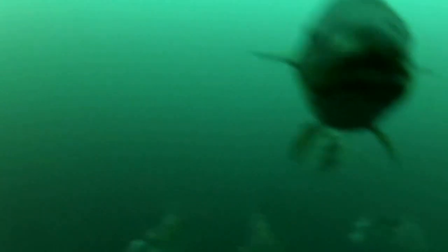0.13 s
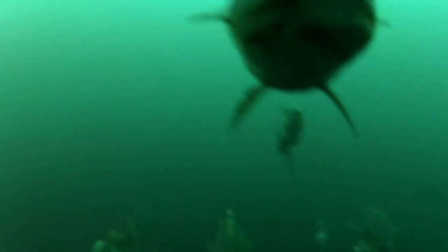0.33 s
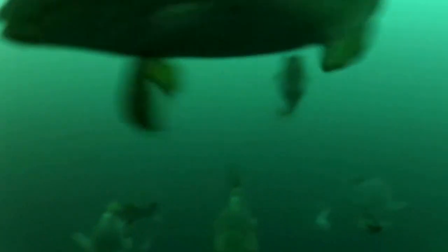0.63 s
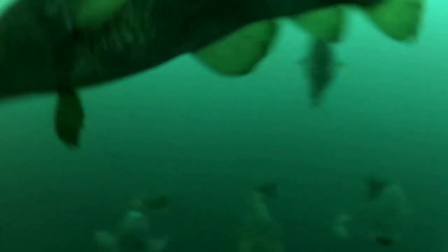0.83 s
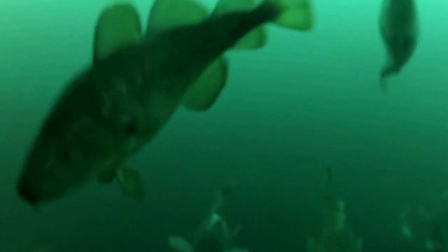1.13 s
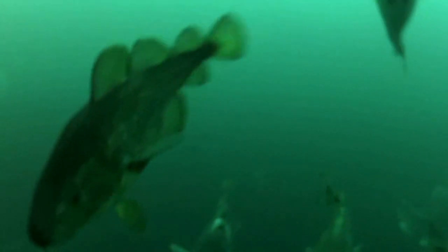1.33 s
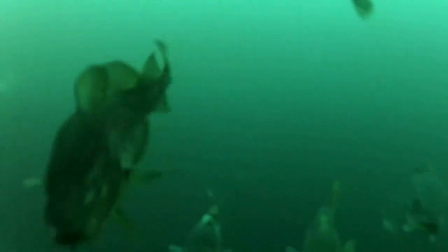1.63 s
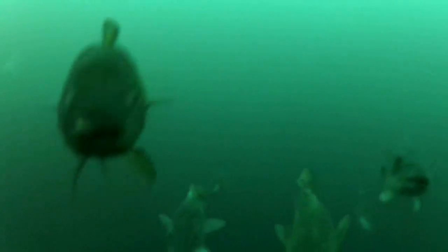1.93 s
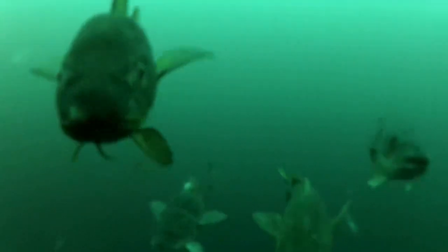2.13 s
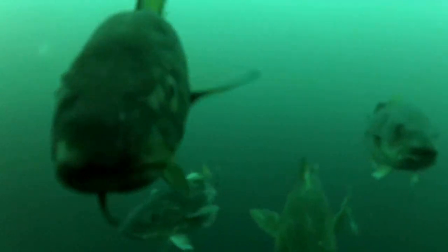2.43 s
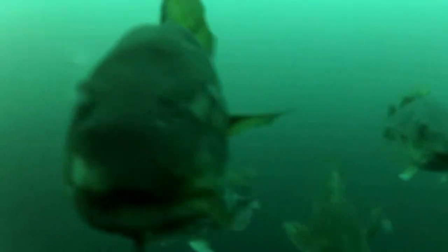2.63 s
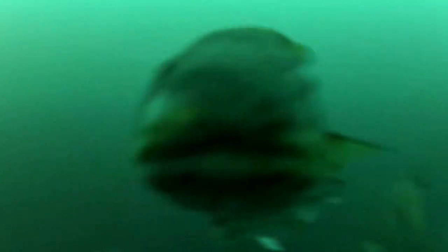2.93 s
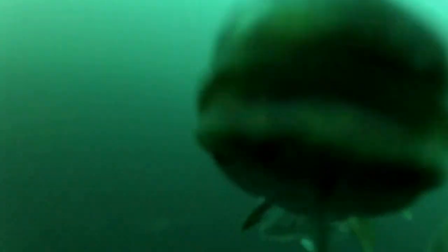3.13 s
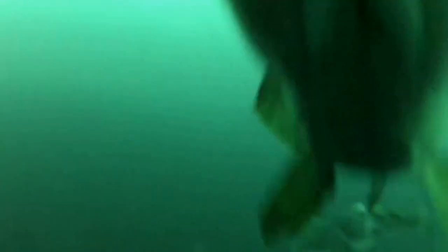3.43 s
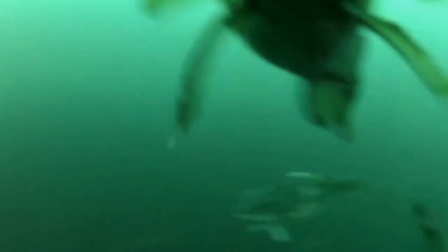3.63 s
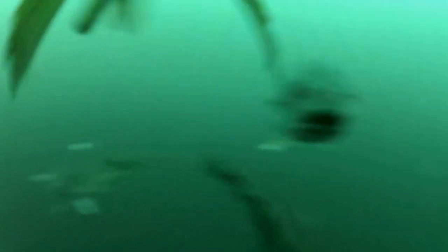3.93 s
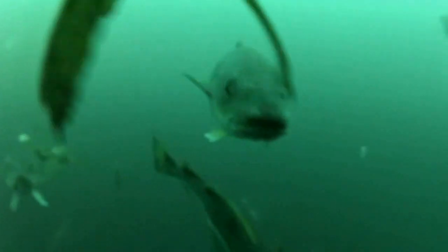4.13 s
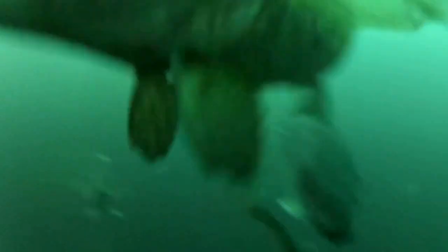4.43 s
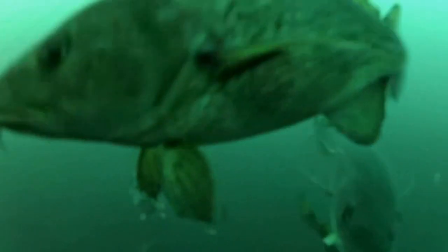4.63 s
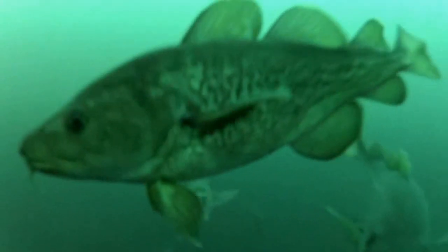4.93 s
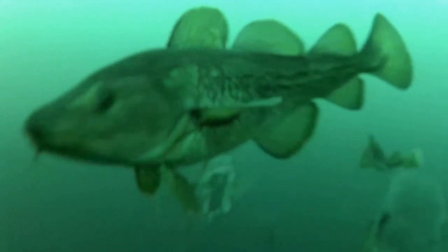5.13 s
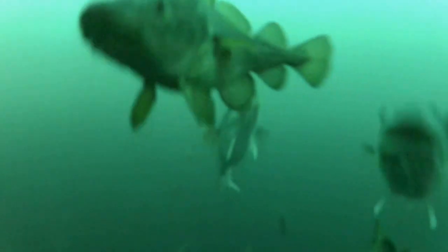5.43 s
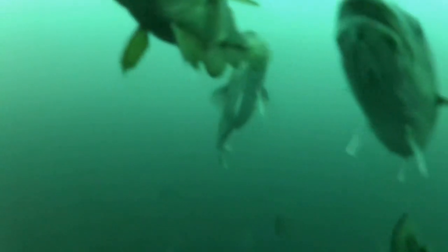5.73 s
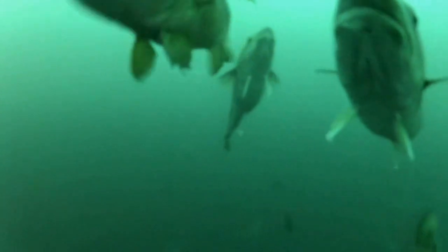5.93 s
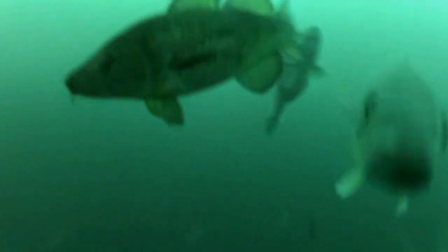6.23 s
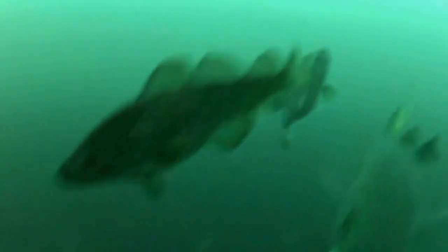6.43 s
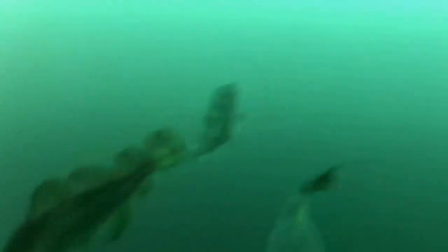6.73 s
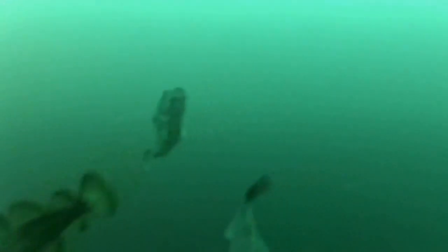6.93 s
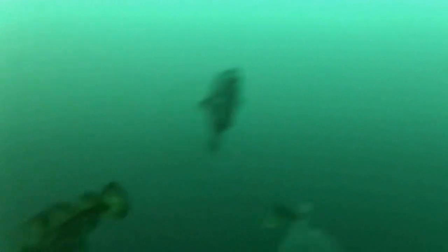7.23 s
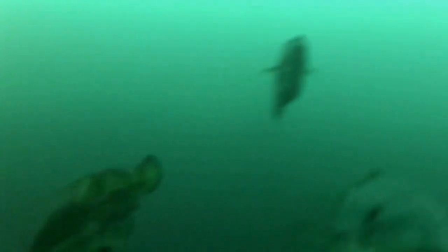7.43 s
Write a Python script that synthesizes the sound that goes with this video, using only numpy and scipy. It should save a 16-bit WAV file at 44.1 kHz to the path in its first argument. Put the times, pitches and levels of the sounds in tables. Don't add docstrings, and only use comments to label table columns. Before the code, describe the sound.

Inside a sealed camera hanging underwater, a faint low rumble, wavering hum and hollow hiss continue throughout. A dull thud comes after half a second, then tiny rubs. Past three seconds a strong bump with scraping lands, followed by the hardest knock at four seconds with crisp rattles and nibbling ticks. Afterwards only light taps and faint scratches remain. The sound is close, muffled and low-fidelity.

```python
import sys
import numpy as np
from scipy import signal
from scipy.fft import rfft, irfft
from scipy.io import wavfile
from scipy.ndimage import uniform_filter1d

SR = 44100
rng = np.random.default_rng(int(sys.argv[2]) if len(sys.argv) > 2 else 0)


def volts_from_db(level):
    exponent = np.asarray(level, float) / 20
    return 10 ** exponent


def wrap_up_sound(samples):
    columns = np.atleast_2d(samples).T
    tamed = np.clip(columns, -1, 1)
    steps = np.round(tamed * 32767).astype(np.int16)
    wavfile.write(sys.argv[1], SR, steps)


N = 334278

# (time [s], strum rate [Hz], strength [dB], harmonic it favours [number])
LINE_STRUM = [(0, 26.24, -67.5, 3), (.35, 27.6, -64.5, 3.4), (1.0, 26.1, -59.5, 3.26),
              (1.35, 25, -64.5, 2.7), (1.7, 25.4, -62.5, 2.8), (2.05, 28.94, -60, 3.8),
              (2.7, 29.07, -60.5, 3.1), (2.95, 29.33, -66, 2.3), (3.8, 29.48, -60, 2.6),
              (4.5, 29.49, -61.5, 3.36), (5.2, 26.14, -67.5, 2.4), (5.45, 28.24, -59.5, 3.1),
              (6.05, 29.77, -62.5, 2.38), (6.35, 29.25, -64.5, 3.4), (6.65, 25, -61, 2.7),
              (6.88, 23.56, -76, 3.1), (7.05, 21.64, -66, 3.5), (7.58, 21.84, -66.5, 2.3)]


def rms_one(x):
    return x / np.sqrt(np.mean(x ** 2) + 1e-20)


def in_time(rows):
    s, *columns = np.transpose(rows)
    return [np.interp(np.arange(N) / SR, s, column) for column in columns]


def drift(rate):
    r = np.exp(-80 * np.pi * rate / SR)
    noise = rng.standard_normal(N // 40 + 2002)
    slow = signal.lfilter([1], [1, -2 * r, r * r], noise)[2000:]
    return np.interp(np.arange(N) / 40, np.arange(len(slow)), rms_one(slow))


def resonate(x, hz, width_hz):
    r = np.exp(-np.pi * width_hz / SR)
    top = np.array([1, 0, -1]) * (1 - r * r) / 2
    return signal.lfilter(top, [1, -2 * r * np.cos(2 * np.pi * hz / SR), r * r], x)


def banded_noise(spectrum, patchy_db, flicker):
    hz, level_db = np.transpose(spectrum)
    edges = hz[0] * 2 ** np.arange(0, np.log2(hz[-1] / hz[0]) + .2, 1 / 3)
    together = drift(flicker / 2)
    white = rng.standard_normal((2, N))
    out = 0
    for k, (low, high) in enumerate(zip(edges, edges[1:])):
        band_pass = signal.butter(2, [low, high], "band", fs=SR, output="sos")
        band = signal.sosfilt(band_pass, white[k % 2])
        colour_db = np.interp(np.log(low * high) / 2, np.log(hz), level_db)
        flicker_db = patchy_db * (0.82 * together + drift(flicker))
        out = out + volts_from_db(colour_db + flicker_db) * band
    return rms_one(out)


def blows(firmness):
    # (time [s], direction [sign and share], peak [dB], swing [Hz], time to peak [s])
    firming = [
        (0.5296, 1, -21.1, 113, .0044),
        (0.5515, -1, -32.3, 84, .0047),
        (3.324, -1, -37.8, 27, .0105),
        (4.0143, -1, -15.8, 49, .0078),
        (4.0688, 1, -29.2, 121, .0035),
        (4.2527, 1, -37.2, 20, .0175),
        (4.2734, -1, -41.0, 31, .0093),
    ]
    sliding = [
        (0.556, 1, -34.1, 55, .0263),
        (3.287, -1, -33.0, 41, .0282),
        (4.0315, 1, -17.3, 37, .0067),
        (4.0398, -1, -18.4, 56, .0158),
    ]
    yielding = [
        (0.5368, 1, -27.9, 53, .0115),
        (3.3062, -1, -14.6, 93.5, .0091),
        (4.2663, 1, -33.8, 164, .003),
        (4.319, 1, -43, 82, .008),
        (4.407, -1, -41, 80, .006),
        (5.46, -1, -45, 220, .008),
    ]
    slaps = [
        (.5312, -0.87, -37, 370, 0.0035),
        (.54, -0.96, -41, 310, 0.0012),
        (1.8405, 1, -43.5, 450, 0.0036),
        (1.86, 0.88, -53, 209, 0.017),
        (3.352, 0.98, -51, 350, 0.016),
        (4.778, 0.91, -54.5, 1040, .013),
        (5.7, 0.54, -52, 176, 0.01),
    ]
    t = np.arange(SR // 8) / SR
    out = np.zeros(N)
    for table, sag_per_s in ((firming, -19), (sliding, 77), (yielding, 26), (slaps, 0)):
        for s, direction, peak_db, hz, rise in table:
            load = (t / rise * np.exp(1 - t / rise)) ** firmness
            swing = np.sin(2 * np.pi * hz * t / np.maximum(1 + sag_per_s * t, .3))
            at = round(s * SR)
            out[at:at + len(t)] += direction * volts_from_db(peak_db) * load * swing
    return out


def scrape_pressure():
    # (time of most pressure [s], wall level [dB], build-up [s], let-go [s])
    fin_rubs = [(1.19, -67, .01, 0.021), (1.85, -62, .0022, 0.012), (1.876, -67, 0.0048, 0.0047),
                (1.895, -59, 0.0031, 0.0067), (1.914, -71, 0.0018, 0.015), (3.343, -57, 0.0061, 0.0037),
                (3.350, -50, .0012, .002), (3.359, -65, 0.0031, .013), (4.79, -66, 0.019, .016),
                (4.826, -79, .003, .0031), (6.68, -66.5, 0.015, 0.011)]
    scale_rubs = [(2.122, -53.5, .006, 0.0036), (3.317, -50.5, 0.0073, 0.0055), (3.350, -51.5, .0012, .002),
                  (4.029, -42, 0.0016, 0.0043), (4.065, -46, 0.0077, 0.0019), (4.071, -35, 0.0007, 0.0031),
                  (5.25, -53.5, 0.0038, .0077), (5.385, -57, 0.0026, .0033), (6.79, -62, 0.0058, .011)]
    tooth_nips = [(4.038, -53, 0.0021, .0025), (4.082, -51, 0.0046, 0.015), (4.268, -37.5, 0.002, 0.0026),
                  (4.2737, -45, .0011, .004), (4.281, -58, 0.0021, 0.0018), (5.234, -58.5, 0.0046, .005),
                  (6.95, -64, .045, 0.043)]
    lip_nips = [
        (4.367, -57, 0.0024, .0025),
        (4.388, -54, 0.0022, 0.0019),
        (4.397, -63, 0.0018, 0.0049),
    ]
    # (dull ringing [dB], bright ringing [dB])
    fin = (10.1, -22)
    scale = (-4, -11)
    tooth = (-9.5, -2.9)
    lip = (6.9, -2)
    reach = SR // 10
    t = np.arange(-reach, reach) / SR
    pressure = np.zeros((3, N))
    for table, colour in ((fin_rubs, fin), (scale_rubs, scale), (tooth_nips, tooth), (lip_nips, lip)):
        dull_db, bright_db = colour
        for s, wall_db, build, release in table:
            at = round((s - .001) * SR)
            stroke = np.exp(np.minimum(t / build, -t / release))
            share_db = np.array([[dull_db], [0], [bright_db]])
            pressure[:, at - reach:at + reach] += volts_from_db(wall_db + share_db) * stroke
    return pressure


def scrapes(per_s, spread_db):
    # (pitch [Hz], level [dB], time to fade by 60 dB [s])
    dull_modes = [(250, -6, .03), (360, 1, .06), (540, 3, .045), (730, -7, .03), (980, -7, .025),
                  (1210, -5, .025)]
    wall_modes = [(1215, -12, .02), (1540, -1, .018), (1930, 0, .016), (2360, 1, .014), (2700, -6, .008)]
    bright_modes = [(3125, -1, .019), (3390, 1, .019), (3700, -7, .012), (4550, -11, .006),
                    (5120, -15, .006)]
    happens = rng.random(N) < per_s / SR
    strength = volts_from_db(spread_db * np.minimum(rng.exponential(1, N), 3))
    clicks = rms_one(happens * strength * rng.choice([-1, 1], N))
    out = 0
    for modes, force in zip((dull_modes, wall_modes, bright_modes), scrape_pressure()):
        widths = [np.log(1000) / (np.pi * t60) for hz, level_db, t60 in modes]
        power = sum(volts_from_db(2 * mode[1]) * np.pi * width / SR for mode, width in zip(modes, widths))
        for k, ((hz, level_db, t60), width_hz) in enumerate(zip(modes, widths)):
            push = np.roll(clicks, 97 * k) * force + 1e-18
            gain = (-1) ** k * volts_from_db(level_db) / np.sqrt(power)
            out = out + gain * resonate(push, hz, width_hz)
    soft_top = signal.butter(2, 4500, fs=SR, output="sos")
    return volts_from_db(-0.5) * signal.sosfilt(soft_top, out)


def strum(wobble, unsteady_db):
    hz, strength_db, favoured = in_time(LINE_STRUM)
    phase = 2 * np.pi * np.cumsum(hz * (1 + wobble * drift(2.854))) / SR
    hum = 0
    for k in range(3):
        harmonic = k + 2
        off_favour_db = 3.2 * (harmonic - favoured) ** 2
        level_db = strength_db - off_favour_db + unsteady_db * drift(5.1)
        hum = hum + np.sqrt(2) * volts_from_db(level_db) * np.sin(harmonic * phase + k * 1.44)
    return hum, np.sin(phase)


def wall_hiss(patchy_db):
    # (pitch [Hz], width [Hz], level [dB])
    walls = [(925, 126, -11), (1134, 130, -6.5), (1236, 116, -3), (1620, 187, -5), (1935, 190, 1),
             (2170, 99, -8), (2431, 316, 0.5), (2510, 320, -24)]
    gusts = drift(4.4)
    white = rng.standard_normal((2, N))
    out = 0
    for k, (hz, width_hz, level_db) in enumerate(walls):
        once = resonate(white[k % 2], hz, 1.25 * width_hz)
        tone = rms_one(resonate(once, hz, 1.25 * width_hz))
        out = out + volts_from_db(level_db + patchy_db * (1.0 * gusts + 0.3 * drift(6.0))) * tone
    return rms_one(out)


def water_noise(flow_db):
    # (pitch [Hz], level [dB per Hz])
    rumble = [(8, -9), (20, -15), (32, -4.5), (50, -1.5), (80, -0.5), (120, -1.5), (160, -8.5), (230, -8.5)]
    wash = [(88, -25), (150, -2), (362, -4), (463, -7.5), (700, -12.5), (1000, -14), (1300, -45),
            (2200, -120)]
    shake_db = in_time(LINE_STRUM)[1]
    rumble_db = -63 + .25 * (shake_db - shake_db.mean())
    wash_db = -61.5 + 0.37 * flow_db
    water = volts_from_db(rumble_db) * banded_noise(rumble, patchy_db=1.0, flicker=10.0)
    return water + volts_from_db(wash_db) * banded_noise(wash, patchy_db=1.07, flicker=17.0)


def circuit_noise():
    # (pitch [Hz], level [dB per Hz])
    self_noise = [(700, -0.5), (1400, -3.5), (2800, -2), (3600, -3), (4300, -3.5), (5000, -5.5), (7000, -3)]
    return volts_from_db(-67) * banded_noise(self_noise, patchy_db=-0.14, flicker=32.0)


def scene():
    # (time [s], flow above its mean [dB])
    flow = [(0.0, 0), (0.7, -1.5), (1.5, -1), (1.94, 2), (2.8, -0.2), (3.3, 0.2), (4.2, -0.7), (5.3, 1),
            (6.0, 0.2), (6.5, 1.8), (7.03, 4), (7.3, 0.9), (7.58, 1.7)]
    flow_db, = in_time(flow)
    fish = blows(firmness=4) + scrapes(per_s=6000, spread_db=3.5)
    hum, eddy = strum(wobble=0.0298, unsteady_db=2.0)
    walls = volts_from_db(-62.5 + flow_db) * wall_hiss(patchy_db=0.88)
    gusty_walls = walls * volts_from_db(1.0 * eddy)
    return (fish + hum + gusty_walls + water_noise(flow_db) + circuit_noise())[None]


def drop_faint_bands(x):
    # (pitch [Hz], level [dB per Hz])
    audible = [(10500, -132), (11500, -127), (13000, -125), (13450, -121), (14000, -124), (15250, -125),
               (15400, -114), (15900, -90)]
    hz, t, bins = signal.stft(x, SR, nperseg=1024, scaling="psd")
    power = uniform_filter1d(abs(bins) ** 2, size=5, axis=-2)
    power = uniform_filter1d(power, size=3, axis=-1)
    line = volts_from_db(2 * np.interp(hz, *np.transpose(audible), left=-200))
    return signal.istft(bins * (power > line[:, None]), SR, nperseg=1024, scaling="psd")[1][..., :N]


def band_limit(x):
    return signal.sosfilt(signal.butter(12, 15670, fs=SR, output="sos"), x)


def record(dry):
    hold_hz = 12012
    x = signal.sosfilt(signal.butter(12, 5300, fs=SR, output="sos"), dry)
    sampled = x * (1 + 2 * np.cos(2 * np.pi * hold_hz * np.arange(N) / SR))
    hz = np.arange(N // 2 + 1) * SR / N
    hold = np.sinc(hz / hold_hz)
    smoothing = 1 / np.sqrt(1 + (hz / 15100) ** 24)
    held = irfft(rfft(sampled) * hold * smoothing, N)
    return band_limit(drop_faint_bands(held))


dry = scene()
out = record(dry)
wrap_up_sound(out)
```